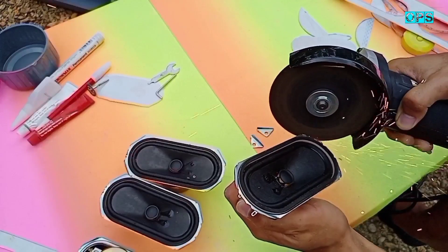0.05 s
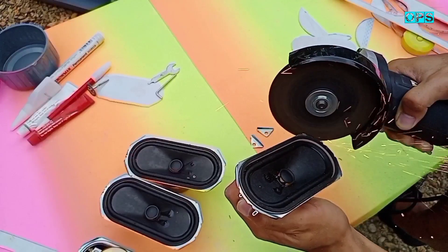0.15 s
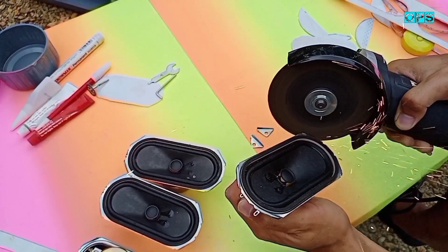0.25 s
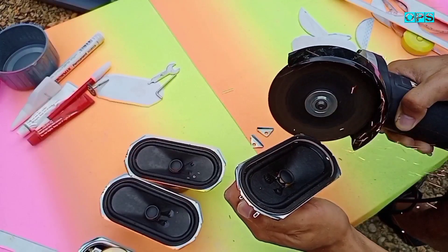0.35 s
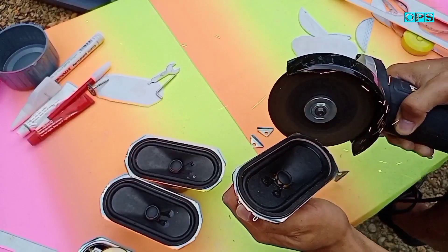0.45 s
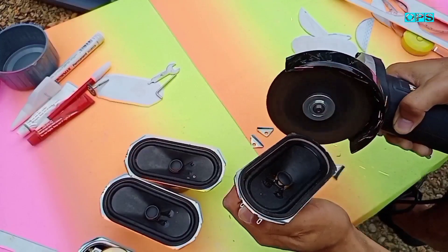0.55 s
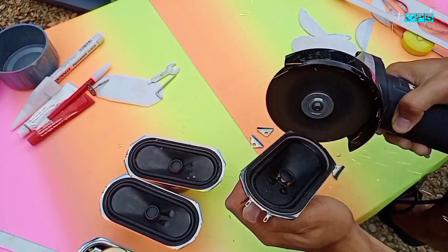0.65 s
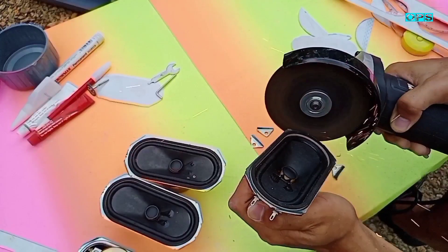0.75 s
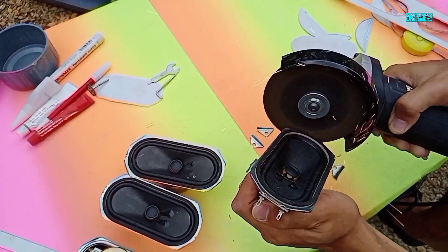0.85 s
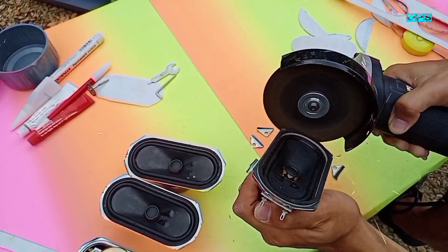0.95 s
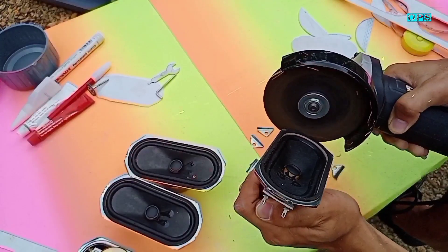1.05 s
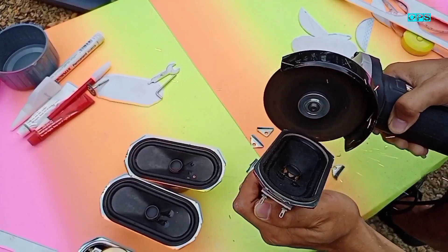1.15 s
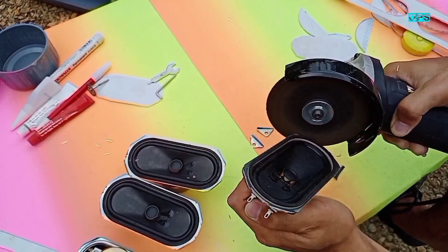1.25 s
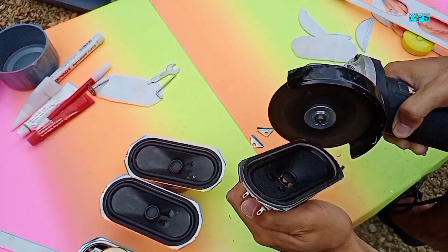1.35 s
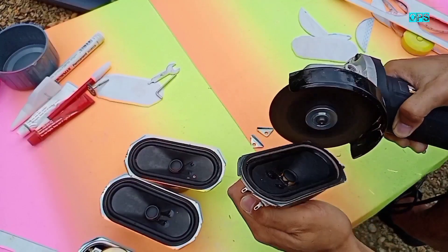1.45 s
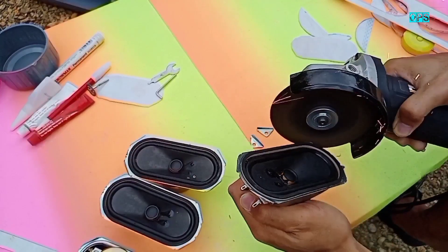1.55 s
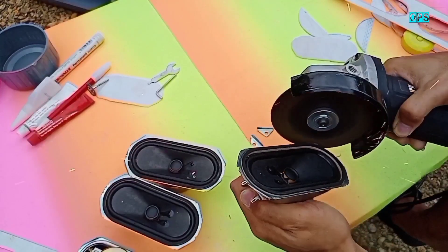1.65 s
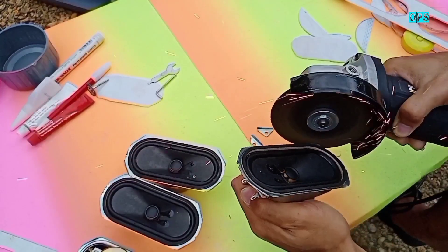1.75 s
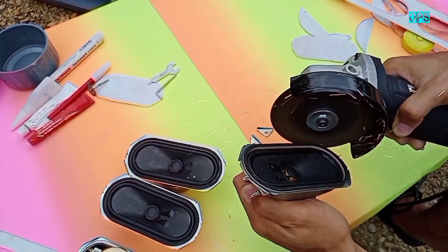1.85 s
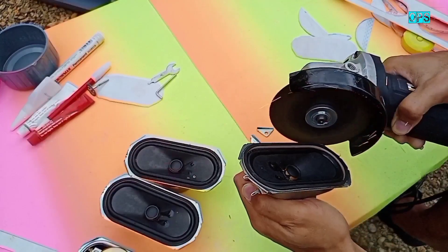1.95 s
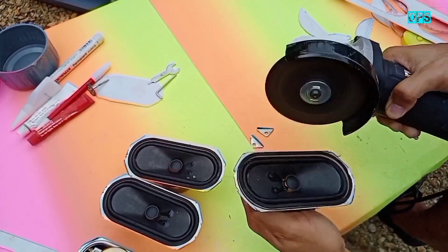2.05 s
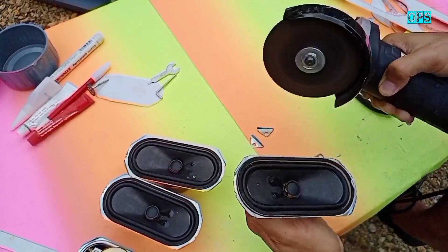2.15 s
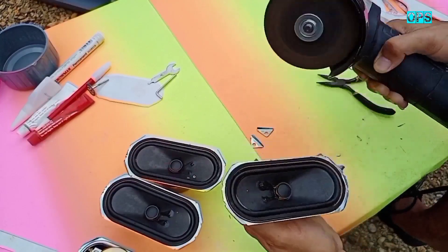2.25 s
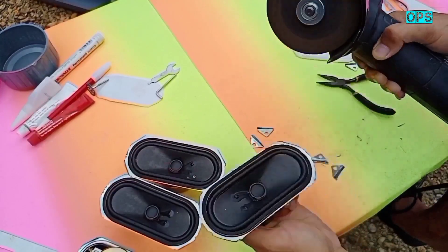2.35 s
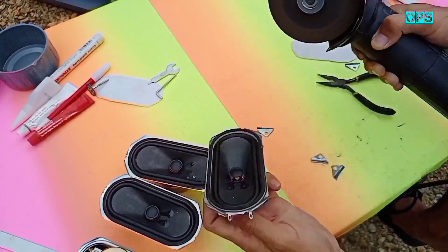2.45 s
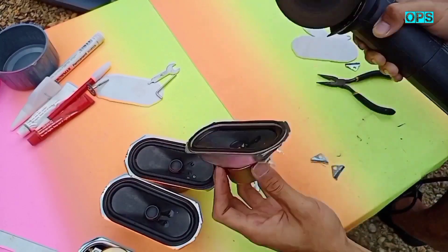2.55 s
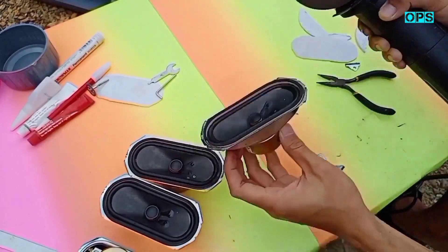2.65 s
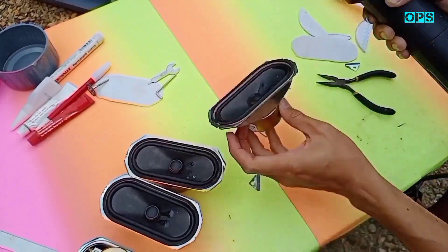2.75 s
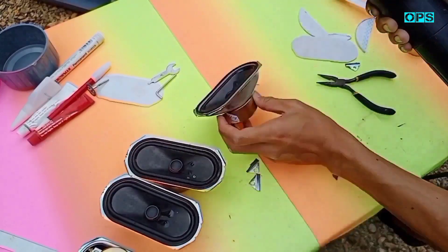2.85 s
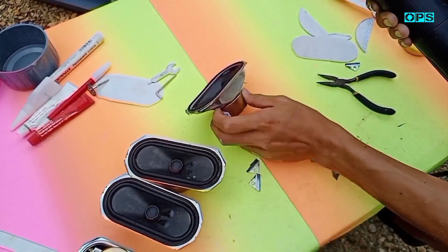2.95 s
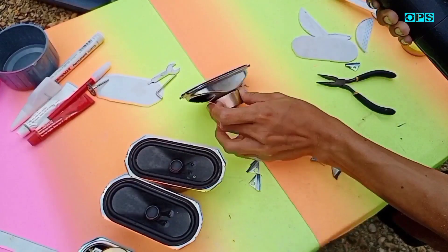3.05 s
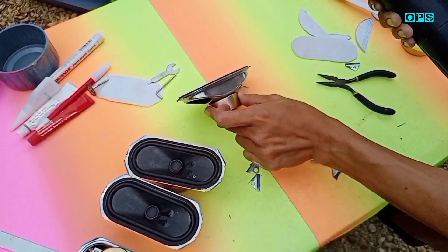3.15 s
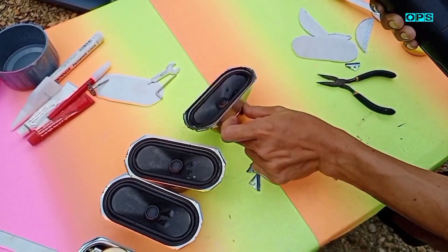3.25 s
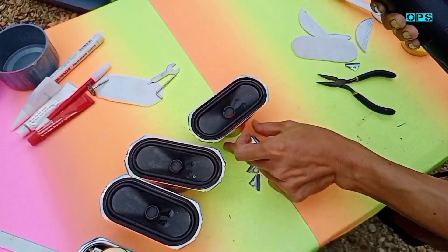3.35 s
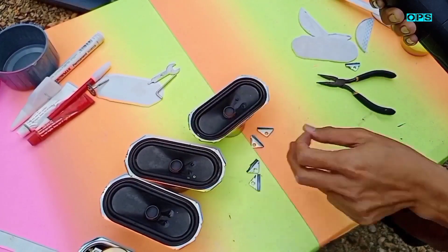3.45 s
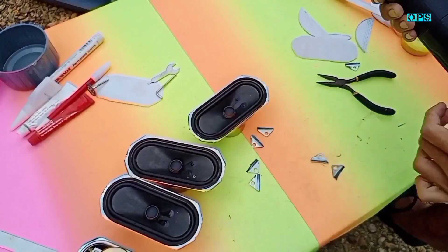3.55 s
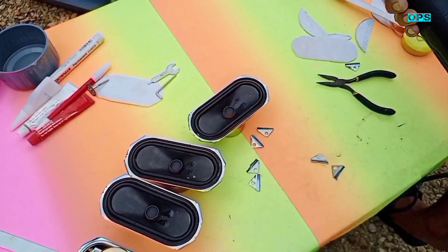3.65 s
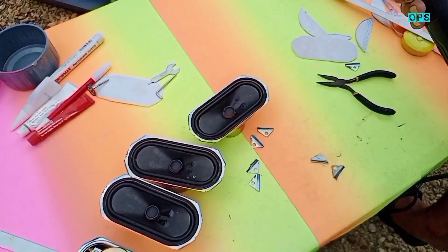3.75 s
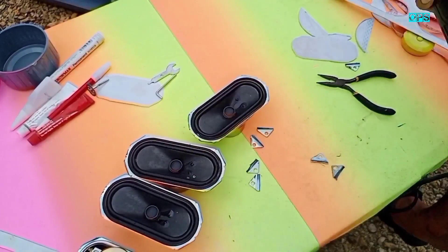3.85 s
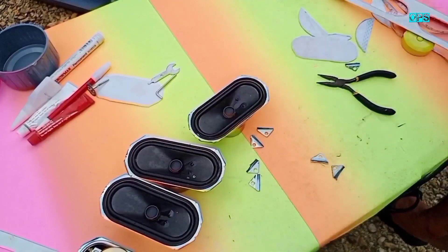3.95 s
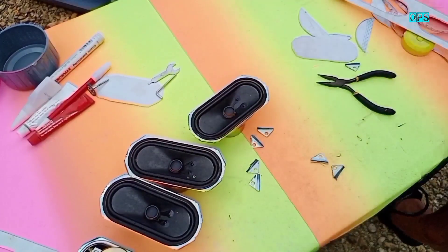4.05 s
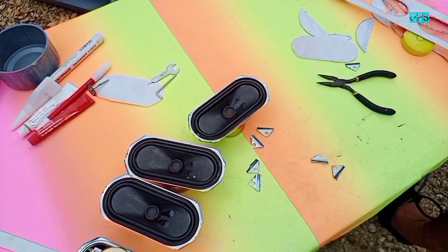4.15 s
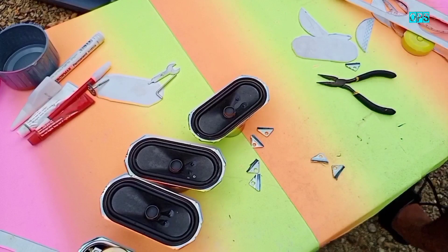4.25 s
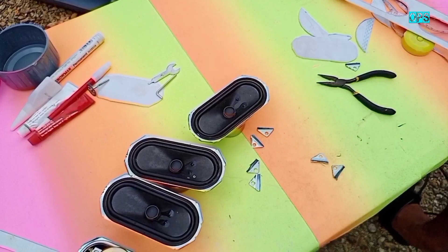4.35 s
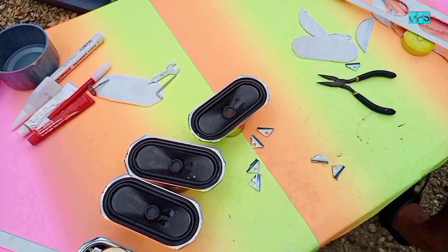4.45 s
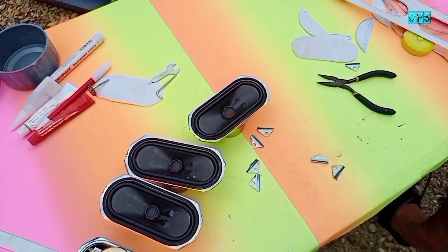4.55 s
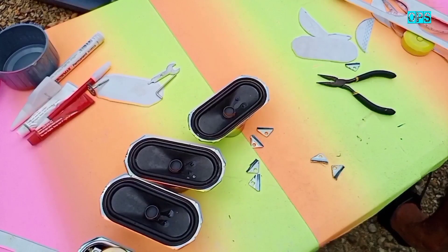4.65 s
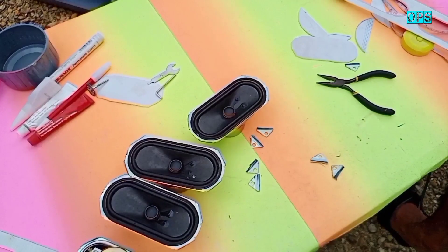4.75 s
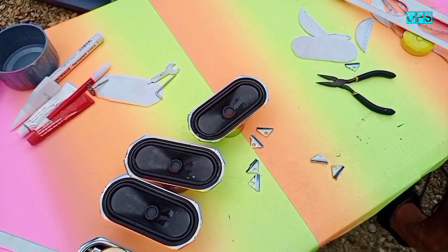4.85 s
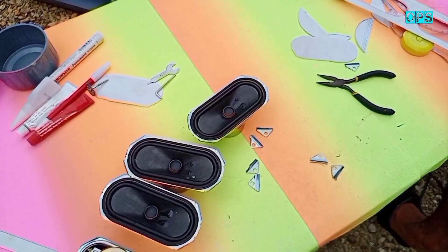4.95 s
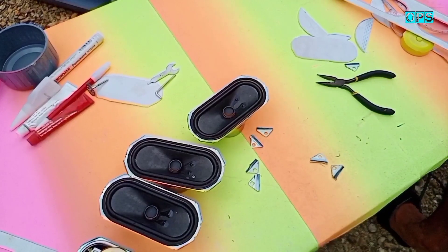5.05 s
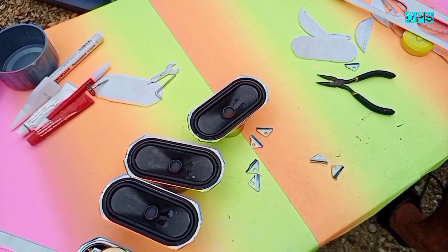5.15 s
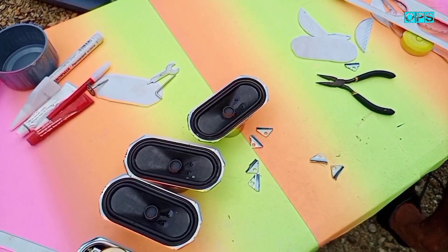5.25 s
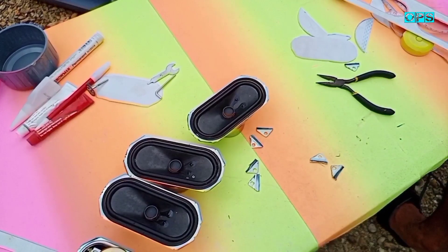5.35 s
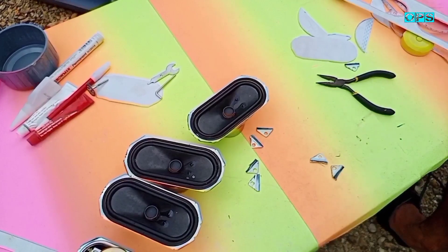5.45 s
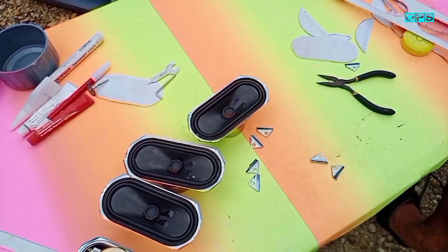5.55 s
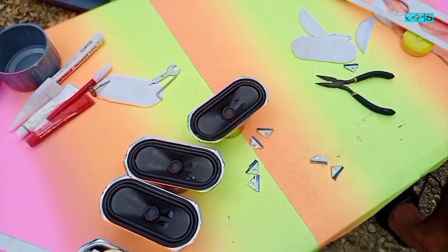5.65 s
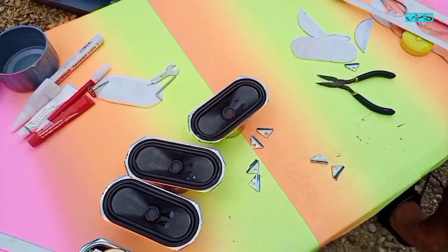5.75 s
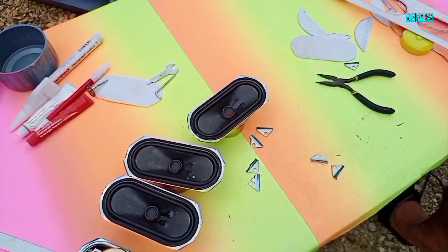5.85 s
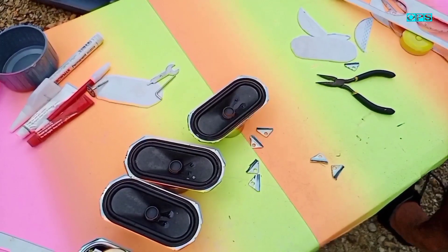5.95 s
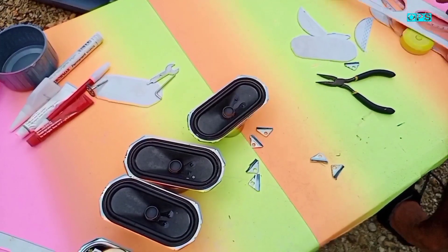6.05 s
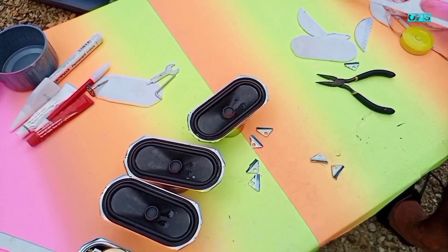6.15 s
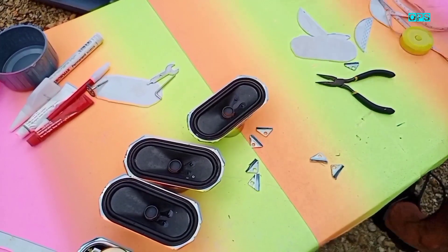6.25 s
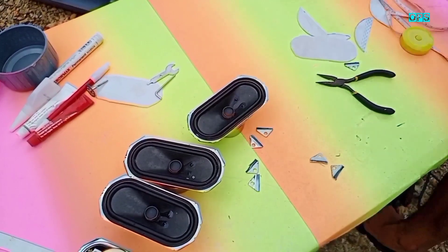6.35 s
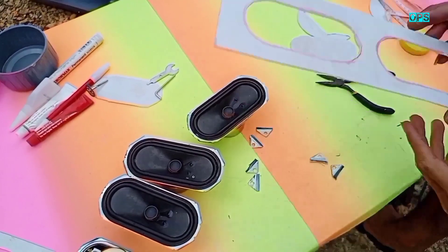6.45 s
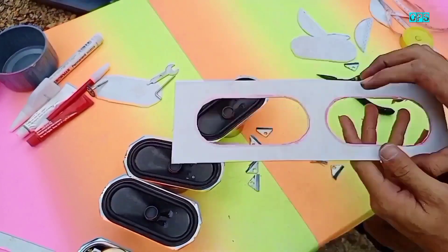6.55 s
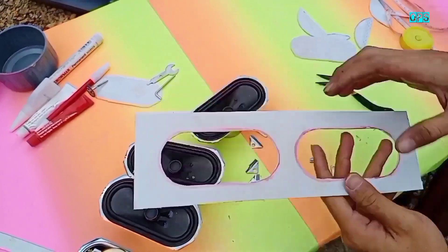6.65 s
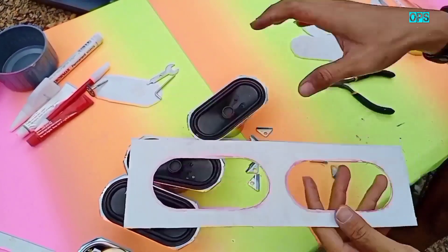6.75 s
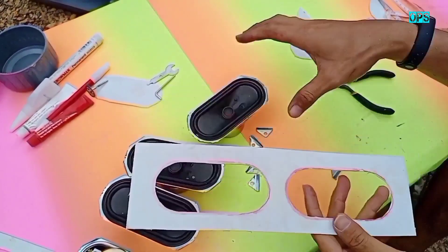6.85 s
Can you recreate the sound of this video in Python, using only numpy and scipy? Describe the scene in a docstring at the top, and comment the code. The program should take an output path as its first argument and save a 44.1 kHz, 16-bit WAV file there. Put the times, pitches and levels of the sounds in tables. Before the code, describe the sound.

Close, dry grinding of a thin metal rim, first deep then light and popping, before the grinder hisses, coasts down, and a light panel taps the table.

```python
"""At a work table, an angle grinder trims the thin steel rim of a small loudspeaker, heard by one microphone.
A deep cut is made of scraping noise and thuds once a turn; a lighter cut skips, rings and chatters.
The disc comes free and hisses with fan air and gears, then the motor is switched off and coasts down
with a falling whine of sine tones and rattling gears made of short noise bursts.
A flat panel is slid as filtered noise and tapped as fading tones, over a faint outdoor murmur."""
import sys
import numpy as np
from scipy import signal
from scipy.fft import rfft, irfft
from scipy.io import wavfile
from scipy.ndimage import uniform_filter1d, map_coordinates

SR = 44100
rng = np.random.default_rng(int(sys.argv[2]) if len(sys.argv) > 2 else 0)


def store_pcm(level_fs):
    """Save levels as 16-bit WAV."""
    pcm = np.round(np.clip(level_fs, -1, 1) * 32767).astype(np.int16)
    wavfile.write(sys.argv[1], SR, np.atleast_2d(pcm).T)


N = 303849
T = np.arange(N) / SR  # time in seconds

# the job (s): the deep cut breaks through, the disc comes free, the motor is switched off, the disc stops
BREAK_S, CLEAR_S, OFF_S, STOP_S = 0.56, 2.14, 3.95, 6.225
# turns of the motor's rotor for each turn of the disc
GEAR_RATIO = 3.76


def amp(db):
    """Turns decibels into a multiplier."""
    return 10 ** (np.asarray(db) / 20)


def unit(x):
    """Scales a sound to an average (RMS) strength of one."""
    return x / np.sqrt(np.mean(x ** 2) + 1e-20)


def noise():
    """Plain white hiss for the whole scene."""
    return rng.standard_normal(N)


def ramp(start, length):
    """Rises in a straight line from 0 to 1; both times in seconds."""
    return np.clip((T - start) / max(length, 1e-4), 0, 1)


def during(start, end, attack=0.0099, release=.008):
    """Rises just before the start, holds at one, and dies away after the end."""
    return ramp(start - attack, attack) * (1 - ramp(end, release))


def swell(s, half_length):
    """A smooth rise and fall around one moment."""
    return np.exp(-((T - s) / half_length) ** 2)


def wander(hz):
    """A smooth random wobble of unit size, with little movement faster than hz."""
    smoothing = np.exp(-(np.fft.rfftfreq(N, 1 / SR) / hz) ** 2)
    return unit(irfft(rfft(noise()) * smoothing, N))


def add(mix, s, sound):
    """Mixes in a short sound from s seconds on."""
    part = mix[round(s * SR):][:len(sound)]
    part += sound[:len(part)]


def impulse(points, size=4096):
    """The click whose spectrum follows the points, with nothing sounding before its start."""
    f, db = np.transpose(points)
    log_pitch = np.log(abs(np.fft.fftfreq(size, 1 / SR)) + 1)
    log_gain = np.log(amp(np.interp(log_pitch, np.log(f), db)))
    # the Hilbert transform supplies the matching phase
    spectrum = np.exp(np.conj(signal.hilbert(log_gain)))
    return np.fft.ifft(spectrum).real[:size // 2]


def colour(x, points):
    """Gives a sound the tone colour in the points, at unit strength."""
    return unit(signal.oaconvolve(x, impulse(points))[:N])


def resonate(x, hz, width):
    """Lets one resonance, like that of a struck part, ring with the sound."""
    return signal.lfilter(*signal.iirpeak(hz, hz / width, SR), x)


def drift(x, patchy_db):
    """Weak reflections off hands and clutter ripple the spectrum, and change as things move."""
    z = signal.stft(x, nperseg=1024, noverlap=768)[2]
    ripple = rng.standard_normal(z.shape)
    # smooth across pitch (axis 0), then across time (axis 1)
    for size, axis in [(9, 0), (5, 0), (31, 1), (11, 1)]:
        ripple = uniform_filter1d(ripple, size, axis)
    rippled = z * amp(patchy_db * unit(ripple))
    return signal.istft(rippled, nperseg=1024, noverlap=768)[1][:N]


# disc speed (turns per second): running free, at the outset, bogged down in the deep cut
IDLE_HZ, START_HZ, LOADED_HZ = 310.2, 298.2, 294.8
# time constants (s) of the sag under load and of the recovery
SAG_S, RECOVER_S = 0.075, 0.19
# coasting: disc speed where air drag equals friction (turns per second), time scale of the run-down (s)
DRAG_HZ, COAST_S = 205.6, 2.31


def disc_speed():
    """Turns per second: load drags the disc down, it recovers, then air drag and friction stop it."""
    sag = (START_HZ - LOADED_HZ) * np.exp(-T / SAG_S)
    load = (IDLE_HZ - LOADED_HZ) * np.exp(-np.maximum(T - BREAK_S, 0) / RECOVER_S)
    coasting = DRAG_HZ * np.tan(np.clip((STOP_S - T) / COAST_S, 0, np.pi / 3))
    return np.minimum(IDLE_HZ - load + sag, coasting)


def grit(turns, keep, spread_db, size=128):
    """The same grains pass the cut on each turn, and slowly wear into new ones."""
    keep = np.clip(keep, 0, .995)
    shape = (int(turns[-1]) + 2, size)  # one row of grains for each turn
    fresh = rng.standard_normal(shape) * amp(spread_db * rng.standard_normal(shape))
    fresh[1:] *= np.sqrt(1 - keep ** 2)
    edge = signal.lfilter([1], [1, -keep], fresh, axis=0)
    return unit(map_coordinates(edge.ravel(), [turns * size], order=3))


# resonances of the thin steel rim: pitch_hz, width_hz, level_db (relative)
RIM_RESONANCES = [(9640, 260, -8), (11000, 300, -6), (11480, 260, -1), (12020, 450, -1), (12740, 220, -1),
                  (12980, 200, 1), (13920, 350, -7)]


def rim_ring(x):
    """Scraping sets the resonances of the thin rim ringing."""
    return unit(sum(amp(db) * resonate(x, hz, width) for hz, width, db in RIM_RESONANCES))


# tone colour of the deep scrape: pitch_hz, level_db (per Hz, relative)
DEEP_COLOUR = [(400, -26), (1000, -14), (2400, -8.5), (3300, -8), (4500, -13.5), (6000, -13), (7500, -10.5),
               (9000, -15.5), (10500, -8), (11500, -8), (12700, -3), (14000, -11), (15400, -14)]
# tone colour of the chattering sheet, also used by its snags: pitch_hz, level_db (per Hz, relative)
CHATTER_COLOUR = [(25, -33.5), (65, -23.5), (100, -11), (150, 0.5), (290, 0.5), (450, -4), (1000, -11.5),
                  (2200, -13.5), (3500, -21.5), (7000, -27)]
# the grinding eases as the disc sinks in, the sheet chatters throughout: levels at the start, then change
DEEP_DB, DEEP_EASE_DB_PER_S, DEEP_RELEASE_S = -24, -11.5, 0.028
CHATTER_DB, CHATTER_EASE_DB_PER_S = -35.5, -3.5


def deep_cut(turns):
    """The high side of the disc bites once a turn, scraping the sheet and pushing it aside."""
    grind_db = DEEP_DB + DEEP_EASE_DB_PER_S * T + 0.54 * wander(15)
    chatter_db = CHATTER_DB + CHATTER_EASE_DB_PER_S * T
    angle = turns % 1
    bite = np.exp(-angle / .25) * np.minimum(angle / .05, 1)
    sunk = ramp(0, BREAK_S)  # the cut grows rougher as the disc sinks in

    grains = grit(turns, keep=.97, spread_db=2) + (.2 + .7 * sunk) * noise()
    scrape = colour((.5 + bite) * grains, DEEP_COLOUR)
    scrape = unit(scrape + amp(-1.5) * rim_ring(scrape))

    # each bite tears off a fresh, uneven burst
    tear = colour(bite ** 2 * noise() * amp(2 * wander(80)),
                  [(300, -9.5), (900, -0.5), (1800, 0.5), (3000, -3), (5000, -6.5), (7000, -7), (15000, -16.0)])

    blows = np.diff(np.floor(turns), prepend=0) * (1 + 0.62 * wander(78))  # one click a turn
    rough_push = unit(bite * noise() * amp(2 * wander(100)))
    push = colour(unit(blows) * 0.73 + rough_push, CHATTER_COLOUR)
    turn_hum = np.sin(2 * np.pi * turns) * (1 + 0.22 * wander(30))
    push = unit(push + .9 * (1 - 0.92 * sunk) * turn_hum)

    rasp = amp(-1.8) * scrape + amp(-12 + 4 * sunk) * tear
    cutting = during(0, BREAK_S, release=DEEP_RELEASE_S)
    return cutting * (amp(grind_db) * rasp + amp(chatter_db) * push)


# disc harmonics that sing out: multiple of the disc speed, deep_cut_db, light_cut_db (both before a 0.5 dB lift)
SINGING_HARMONICS = [(2, -54, -70), (6, -54, -70), (9, -54, -70), (12, -46, -60), (13, -55, -66),
                     (14, -53, -59), (15, -52, -59), (16, -51, -68), (24, -52, -66), (31, -62, -53),
                     (33, -46, -60), (36, -45, -62), (37, -41, -46), (38, -44, -56), (41, -56, -44),
                     (43, -42, -56), (44, -39, -56), (47, -48, -56)]


def singing(turns):
    """Steady harmonics of the turning disc stand out of the rasp."""
    deep = during(0, BREAK_S, release=.025)
    light = during(BREAK_S + .5, CLEAR_S, attack=.5)
    out = np.zeros(N)
    for k, deep_db, light_db in SINGING_HARMONICS:
        level = deep * amp(deep_db + 0.5) + light * amp(light_db + 0.5)
        tone = np.sin(2 * np.pi * k * turns + .5 * wander(60))
        out += level * amp(3.6 * wander(25)) * tone
    return out


# tone colour of the low murmur: pitch_hz, level_db (per Hz, relative)
MURMUR_COLOUR = [(25, -13), (50, -17.5), (75, -17.5), (110, -11.5), (160, 5), (220, -5), (330, -8.5),
                 (450, -13), (700, -18), (1200, -19.5), (4000, -24), (11000, -25), (15500, -39)]
# tone colour of the insects: pitch_hz, level_db (per Hz, relative)
INSECT_COLOUR = [(9000, -50.5), (11500, -40.5), (12600, -11), (12900, -7), (13030, 2), (13200, -12),
                 (14000, -15.5), (14800, -38)]
# faint steady hum: pitch_hz, level_db
HUM_TONES = [(317.6, -89), (473.7, -101), (710.6, -100)]
# swells of the insect shrill: middle_s, half_length_s, level_db
INSECT_CALLS = [(6.344, 0.21, -70.5), (6.86, .07, -68)]


def outdoors():
    """Low murmur of the surroundings, a faint hum and a thin insect shrill: coloured noise and sines."""
    shrill = amp(-82.5) + sum(amp(db) * swell(s, length) for s, length, db in INSECT_CALLS)
    hum = sum(amp(db) * unit(np.sin(2 * np.pi * hz * T + .5 * wander(6))) for hz, db in HUM_TONES)
    murmur = amp(-81.5) * colour(noise(), MURMUR_COLOUR)
    return murmur + hum + shrill * colour(noise(), INSECT_COLOUR)


# the loosened metal flutters: start_s, length_s, level_db (at its start)
FLUTTERS = [(.07, 0.012, -34), (0.218, .05, -37), (1.483, 0.0045, -33), (1.708, 0.064, -37.5),
            (1.757, 0.11, -32), (1.976, 0.0096, -32.5), (2.019, 0.1, -33)]
FLUTTER_ATTACK_S, FLUTTER_RELEASE_S, FLUTTER_FADE_DB_PER_S = 0.0094, 0.02, -22.5
# faint catches between them: average number per second, level
CATCHES_PER_S, CATCH_DB = 140, -39.5
# the disc snags the sheet: time_s (sounds 1 ms later), peak_db (before a 4 dB lift)
SNAGS = [(0.556, -30), (0.572, -27), (0.624, -27.5), (0.636, -28), (0.814, -36), (0.842, -31.5),
         (0.868, -33), (0.898, -32.5), (0.973, -42), (1.11, -32), (1.126, -30.5), (1.187, -32.5),
         (1.281, -33), (1.326, -29), (1.393, -22), (1.424, -31), (1.451, -25.5), (1.495, -21.5),
         (1.55, -27), (1.561, -29.5), (1.607, -31), (1.615, -25), (1.679, -28), (1.703, -24), (1.759, -24),
         (1.852, -28), (1.895, -21.5), (1.963, -22), (1.986, -21.5), (2.03, -25.5), (2.054, -20),
         (2.108, -18)]


def snags(turns):
    """Dull pops where the disc catches the sheet, crowding into a flutter as the metal loosens."""
    pops = (rng.random(N) < 1500 / SR) * np.sign(noise())
    flutter = np.zeros(N)
    for s, length, db in FLUTTERS:
        fading_db = db + FLUTTER_FADE_DB_PER_S * np.maximum(T - s, 0)
        flutter += during(s, s + length, FLUTTER_ATTACK_S, FLUTTER_RELEASE_S) * amp(fading_db)
    bite = 0.28 + np.exp(-(turns % 1) / 0.22)  # the metal is struck hardest once a turn
    out = flutter * colour(pops * bite, CHATTER_COLOUR)

    pop = impulse(CHATTER_COLOUR)
    catches = (rng.random(N) < CATCHES_PER_S / SR) * during(BREAK_S, CLEAR_S) * noise()
    out += amp(CATCH_DB) * signal.oaconvolve(catches, pop / abs(pop).max())[:N]

    t = T[:len(pop)]
    for s, db in SNAGS:
        scuff = 0.082 * rng.standard_normal(len(t)) * np.exp(-t / 0.0031)
        sound = signal.fftconvolve(signal.unit_impulse(len(t)) + scuff, pop)
        add(out, s + .001, amp(db + 4.0) * sound / abs(sound).max())
    return out


# tone colour of the light rasp: pitch_hz, level_db (per Hz, relative)
LIGHT_COLOUR = [(150, -27), (250, -25), (1430, -27), (2440, -20), (3220, -24.5), (3630, -20.5), (6210, -16),
                (7000, -14), (8770, -15.5), (9560, -11), (10400, -13), (11200, -8), (12600, -0.5),
                (15500, -26.5)]
# the hand presses the disc on the edge: middle_s, pressure_db (above grazing)
PRESSES = [(.91, 6), (.97, 7), (1.025, 11), (1.075, 4), (1.14, 4.5), (1.2, 1.5), (1.283, 8), (1.345, 3.5),
           (1.405, -1), (1.482, 6.5), (1.57, 4), (1.688, 5.5)]
# level while the disc only grazes, and half length of a press
GRAZE_DB, PRESS_S = -32.5, .02


def light_cut(turns):
    """The disc skips along the edge in short uneven scrapes; the ring follows the pressure more than the rasp."""
    press_db = sum(db * swell(s, PRESS_S) for s, db in PRESSES)
    contact = (.8 + np.exp(-(turns % 1) / .2)) * amp(2 * wander(600))
    scrape = contact * (grit(turns, keep=.86, spread_db=2) + 1.15 * noise())
    rasp = colour(scrape + 1.0 * noise(), LIGHT_COLOUR) * amp(0.4 * press_db)

    pressed = scrape * amp(1.2 * wander(60) + 2 * wander(500))
    ring = colour(rim_ring(pressed), [(4000, -20.0), (9000, -2.0), (15500, 1.5)])
    ring *= amp(press_db - 5)
    lift = 1 - .5 * ramp(CLEAR_S - .12, .1)  # the ring halves just before the disc comes free
    cutting = during(BREAK_S + 0.019, CLEAR_S)
    return cutting * amp(GRAZE_DB) * drift(rasp + lift * ring, patchy_db=1.24)


# resonances of the tool body: pitch_hz, width_hz, level_db (relative)
BODY_RESONANCES = [(2940, 320, 2), (3080, 520, -5), (3900, 85, 5), (5520, 140, -41), (7560, 180, -14),
                   (8200, 180, 5.5), (9740, 540, -2.5), (11880, 290, 10), (11580, 300, 7),
                   (14650, 300, -4.5)]


def housing(x):
    """The tool body rings at its own resonances."""
    return unit(sum(amp(db) * resonate(x, hz, width) for hz, width, db in BODY_RESONANCES))


# tone colour of the fan air: pitch_hz, level_db (per Hz, relative)
AIR_COLOUR = [(90, -51), (200, -42.5), (400, -31.5), (600, -24.5), (950, -22), (1350, -23.5), (2300, -14.5),
              (3300, -16.5), (4300, -13.5), (5500, -9.5), (7400, -9), (9200, -10), (10700, -7), (12000, 2),
              (12900, -4), (14200, -6.5), (15400, -13)]
# tone colour of the rubbing while coasting: pitch_hz, level_db (per Hz, relative)
COAST_COLOUR = [(300, -16.5), (1100, -32), (1900, -29), (2700, 6), (4200, 8.5), (5000, 7.5), (7500, 8),
                (9000, -27), (10600, -35), (11800, 20), (13500, 10), (15500, 12.5)]
# the gear head sounds in two broad bands: pitch_hz, level_db (per Hz, relative)
GEAR_COLOUR = [(300, -50), (1200, -24), (1600, -9), (2000, 0), (2500, -1), (3100, -16), (3600, -12),
               (4150, -2), (4600, -5), (5000, -20), (7000, -35)]
# the body rubs harder as the rotor nears a housing resonance: middle_s, half_length_s, lift_db
SHUDDER = (4.73, 0.14, 8.2)
# level at full speed, and the power of the speed that it follows
AIR_DB, AIR_POWER = -29, 1.53
RUB_DB, RUB_POWER = -40, 0.86
GEAR_DB, GEAR_POWER = -43.5, 0.91
# the gear head turns to the microphone as the tool is laid aside: start, duration, offset before it
TURN_S, TURN_TAKES_S, TURNED_AWAY_DB = 2.6, 0.77, -6.5
# the slowing gears go slack and their steady noise drops: start, duration, drop
SLACK_S, SLACK_TAKES_S, SLACK_DB = 5.1, 0.41, -26
# the rush of air falls away at low speed: start, duration, drop
STALL_S, STALL_TAKES_S, STALL_DB = 4.67, .22, -11
# echo off the table: average delay with the tool in hand and laid aside, and its strength
ECHO_HELD_MS, ECHO_ASIDE_MS, ECHO_SHARE = 0.557, 0.521, 0.14


def free_run(turns, speed):
    """Fan air and gears hiss; as the rotor slows the air dies and gritty rubbing in the body is left."""
    pace = speed / IDLE_HZ + 1e-9
    aside = ramp(TURN_S, TURN_TAKES_S)
    slack = ramp(SLACK_S, SLACK_TAKES_S)

    delay_ms = ECHO_HELD_MS + (ECHO_ASIDE_MS - ECHO_HELD_MS) * aside + 0.033 * wander(4.9)
    air = colour(noise(), AIR_COLOUR)
    # the cluttered table scatters the top treble
    bounce = signal.filtfilt(*signal.butter(2, 8000, fs=SR), air)
    air = unit(air + ECHO_SHARE * np.interp(T - delay_ms / 1000, T, bounce))
    air *= amp(AIR_DB + STALL_DB * ramp(STALL_S, STALL_TAKES_S)) * pace ** AIR_POWER

    rub = noise() * amp(2.2 * wander(2000) + 1.8 * wander(150))
    coast = unit(colour(rub, COAST_COLOUR) + 0.5 * housing(rub))
    shudder_s, half_length, shudder_db = SHUDDER
    coast *= during(OFF_S + .2, STOP_S - .16, attack=.3, release=0.089)
    coast *= pace ** RUB_POWER * amp(RUB_DB + shudder_db * swell(shudder_s, half_length))

    gear_db = GEAR_DB + TURNED_AWAY_DB * (1 - aside) + SLACK_DB * slack
    gears = amp(gear_db) * pace ** GEAR_POWER * colour(noise(), GEAR_COLOUR)

    throb = (1 + 0.091 * np.cos(2 * np.pi * turns)) * amp(.5 * wander(130) + .5 * wander(24))
    return ramp(CLEAR_S - .015, 0.041) * throb * drift(air + coast + gears, patchy_db=1.8)


# tones of the powered motor: multiple of the rotor speed, level_db
MOTOR_TONES = [(1, -64.5), (2, -62.5), (3, -67.5), (4, -71), (5, -59.5)]
# hum of the freely turning disc: multiple of the disc speed, level_db
DISC_TONE = (3, -71)
# rotor tones swell through resonances: multiple of the rotor speed, loudest_s, half_length_s, level_db
ROTOR_SWELLS = [(22, 4.67, .12, -51), (24, 4.76, .09, -43), (24, 5.16, .24, -55), (29, 4.85, .06, -53),
                (32, 5.05, .13, -53), (17, 5.1, .04, -60), (42, 5.2, .07, -60), (36, 5.45, .07, -63),
                (48, 5.38, .06, -61), (48, 5.56, .06, -57), (72, 5.8, .05, -66)]
# the coasting rotor sweeps through a resonance of the housing
SHAKE_HZ, SHAKE_WIDTH_HZ = 585, 55
# level of the whine at that resonance, and the power of the speed that it follows
WHINE_DB, WHINE_POWER = -58.5, 3


def motor(turns, speed):
    """The powered motor sings; switched off, its unbalance and commutator tones glide down through resonances."""
    rotor, rotor_hz = turns * GEAR_RATIO, speed * GEAR_RATIO
    powered = sum(amp(db) * unit(np.sin(2 * np.pi * k * rotor + 0.23 * wander(30)))
                  for k, db in MOTOR_TONES)
    multiple, hum_db = DISC_TONE
    powered += amp(hum_db) * unit(np.sin(2 * np.pi * multiple * turns + 0.56 * wander(30)))
    powered *= amp(2.5 * wander(12))

    resonance = 1 / np.hypot(1, 2 * (rotor_hz - SHAKE_HZ) / SHAKE_WIDTH_HZ)
    shake = (rotor_hz / SHAKE_HZ) ** WHINE_POWER * resonance
    tone = unit(np.sin(2 * np.pi * rotor + 0.22 * wander(50)))
    tone *= shake * amp(WHINE_DB + 2 * wander(27))
    whine = sum(amp(db) * swell(s, length) * np.sin(2 * np.pi * k * rotor + 0.46 * wander(70))
                for k, s, length, db in ROTOR_SWELLS)
    return during(CLEAR_S, OFF_S) * powered + ramp(OFF_S, 0.037) * tone + whine * amp(3.9 * wander(40))


# gear teeth knock through their play: start_s, level_db (peak, before a 2 dB lift)
KNOCKS = [(5.1123, -32), (5.1652, -33), (5.1826, -34), (5.2006, -34), (5.221, -34), (5.2314, -35),
          (5.243, -35), (5.2654, -31), (5.2879, -33), (5.3014, -36), (5.3154, -36), (5.3344, -37),
          (5.3692, -35), (5.3834, -36), (5.4074, -36), (5.4464, -38), (5.506, -35)]
# tone colour of a knock: pitch_hz, level_db (per Hz, relative)
KNOCK_COLOUR = [(800, -40), (2000, -12), (3100, 2), (4000, 1), (5500, -5), (8000, -2), (10000, -7),
                (11600, 1), (13000, -4), (15500, -6)]
# the gear case hums in swells: middle_s, half_length_s, level_db
CASE_SWELLS = [(4.838, 0.14, -56.5), (5.015, .07, -62.5), (5.23, 0.02, -61.5), (5.38, 0.085, -63.5),
               (5.586, 0.097, -66), (5.776, 0.042, -71), (5.843, 0.033, -71)]
# the rattle at full strength (s), its typical strikes per second and their unevenness
RATTLE_FROM_S, RATTLE_TO_S, STRIKES_PER_S, STRIKE_SPREAD_DB = 4.94, 5.877, 85, 0.5
# level at the start and fade of the teeth's chatter, and of the body ringing with it
RATTLE_DB, RATTLE_FADE_DB_PER_S = -58.5, -1.5
BODY_DB, BODY_FADE_DB_PER_S = -52, -8


def gear_rattle():
    """The slack gears chatter and knock, ringing the body, and the gear case hums at its own pitch."""
    play = np.cumsum(STRIKES_PER_S * amp(2.2 * wander(50))) / SR  # running count of strikes
    phase = play % 1
    strikes = 0.13 + np.exp(-phase / .15) * np.minimum(phase / 0.071, 1)
    strikes *= amp(STRIKE_SPREAD_DB * wander(66))
    chatter = colour(strikes * noise(), [(1500, -25), (1900, -28), (2400, -8), (3000, -1), (3500, 2.0),
                                         (4050, 9.5), (4800, -10), (7000, -15), (15000, -9)])
    body = colour(housing(strikes * noise()), [(1000, -30), (2400, -1.5), (12000, -1), (15500, -2)])
    age = T - RATTLE_FROM_S
    rattle = amp(RATTLE_DB + RATTLE_FADE_DB_PER_S * age) * chatter
    rattle += amp(BODY_DB + BODY_FADE_DB_PER_S * age) * body
    out = during(RATTLE_FROM_S, RATTLE_TO_S, attack=0.24, release=.32) * drift(rattle, patchy_db=2.5)

    t = T[:1024]
    for s, db in KNOCKS:
        burst = rng.standard_normal(len(t)) * t * np.exp(-t / 0.0007)
        knock = unit(signal.fftconvolve(burst, impulse(KNOCK_COLOUR)))
        knock = knock + 0.46 * housing(knock)
        add(out, s, amp(db + 2) * knock / abs(knock).max())

    case_hum = colour(noise(), [(900, -22), (1250, -24), (1400, 3.5), (1560, 6), (1700, -10),
                                (1950, -34), (3000, -61)])
    return out + case_hum * sum(amp(db) * swell(s, length) for s, length, db in CASE_SWELLS)


# the panel slides: start_s, length_s, level_db
SLIDES = [(6.225, 0.053, -60), (6.297, 0.022, -69), (6.344, .012, -62)]
SLIDE_ATTACK_S, SLIDE_RELEASE_S = .004, .02
# tone colour of the slide: pitch_hz, level_db (per Hz, relative)
SLIDE_COLOUR = [(1000, -41), (3000, -15), (5500, -22), (7500, 2.5), (10000, 2), (12500, 12), (15500, -3)]
# the panel taps: start_s, peak_db, contact_pitch_hz, width_hz (of the filter, which is used twice)
TAPS = [(6.159, -57, 3000, 4000), (6.279, -65, 3200, 1490), (6.300, -62, 2500, 1200),
        (6.3048, -46, 2370, 1110), (6.309, -45, 9500, 7000), (6.339, -60, 8500, 3000),
        (6.3995, -33, 11400, 5000), (6.401, -38.5, 5600, 2470), (6.42, -62.5, 774, 400),
        (6.42, -66, 295, 200), (6.791, -57, 13400, 3030), (6.817, -58, 13500, 3000)]
# ways the panel rings: pitch_hz, level_db (relative), t60_s (time to fade by 60 dB)
PANEL_MODES = [(296, -12, .08), (754, -2, 0.067), (1990, 3, 0.025), (2600, 2, 0.035), (3300, 1, 0.033),
               (4300, -5, 0.067), (5250, -4.5, 0.079), (5870, 10.5, 0.016), (6400, 4, 0.028),
               (7450, 3, 0.044), (8270, -2, 0.045), (10800, 4, 0.012), (11630, 5, 0.049), (13400, 8, .025)]


def handling():
    """The panel scuffs over the table and taps it; each contact favours the modes near its own pitch."""
    slide = sum(amp(db) * during(s, s + length, SLIDE_ATTACK_S, SLIDE_RELEASE_S) for s, length, db in SLIDES)
    out = slide * colour(noise() * amp(3.8 * wander(250)), SLIDE_COLOUR)
    t = T[:8192]
    for s, db, contact_hz, width in TAPS:
        ring = sum(amp(mode_db - 60 * t / t60) * np.sin(2 * np.pi * (hz * t + rng.random()))
                   for hz, mode_db, t60 in PANEL_MODES)
        crack = rng.standard_normal(len(t)) * (1.5 * np.exp(-t / 0.0066) + 0.17 * np.exp(-t / 0.028))
        tap = resonate(resonate(ring + crack, contact_hz, width), contact_hz, width)
        add(out, s, amp(db) * tap / abs(tap).max())
    return out


def scene():
    """One disc speed, trembling slightly, drives the cuts, the hiss and the motor."""
    speed = disc_speed()
    turns = np.cumsum(speed * (1 + .0009 * wander(20))) / SR
    cutting = deep_cut(turns) + singing(turns) + snags(turns) + light_cut(turns)
    running = free_run(turns, speed) + motor(turns, speed) + gear_rattle()
    mono = cutting + running + handling() + outdoors()
    return np.array([mono, mono])


# top of the recorder's band
EDGE_HZ = 15480


def record(dry):
    """The recorder's bass cut and band limit."""
    dry = signal.lfilter(*signal.butter(1, 45, "highpass", fs=SR), dry)
    band_limit = signal.firwin(1023, EDGE_HZ, window=("kaiser", 9), fs=SR)
    return signal.oaconvolve(dry, band_limit[None], "same")


dry = scene()
out = record(dry)
store_pcm(out)
```